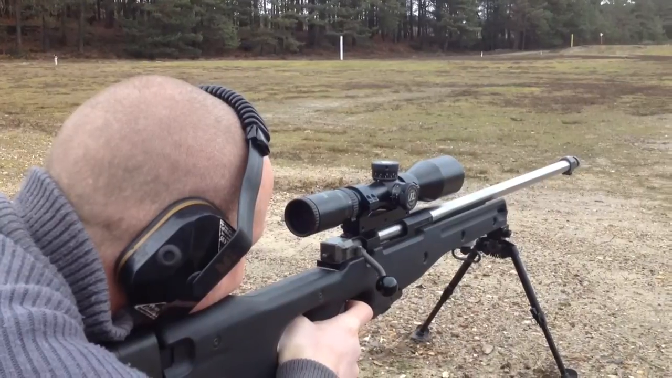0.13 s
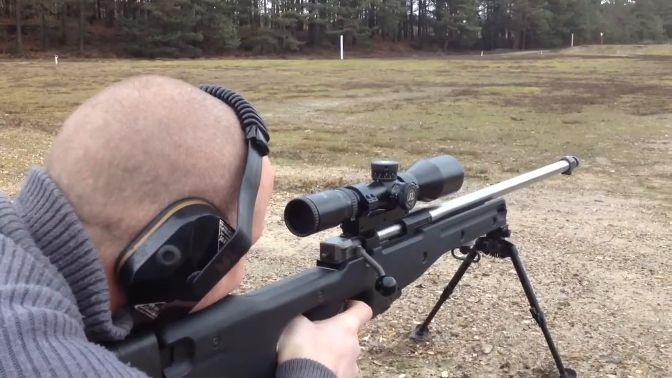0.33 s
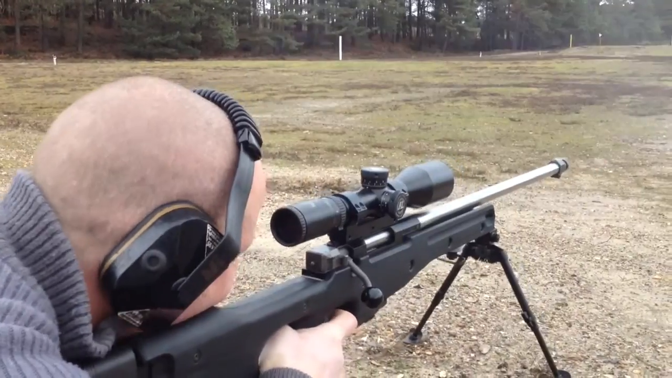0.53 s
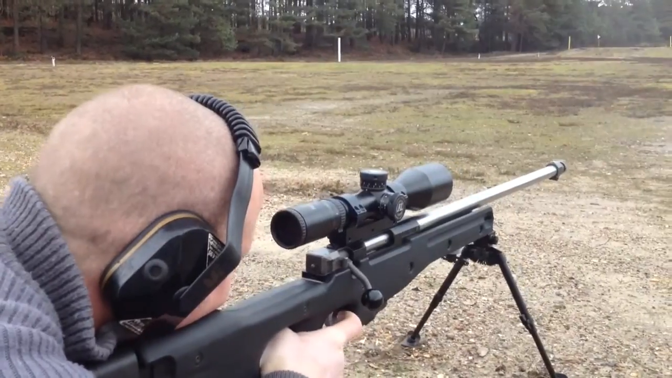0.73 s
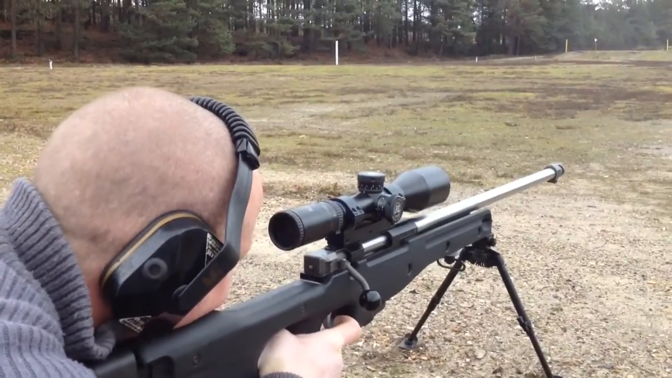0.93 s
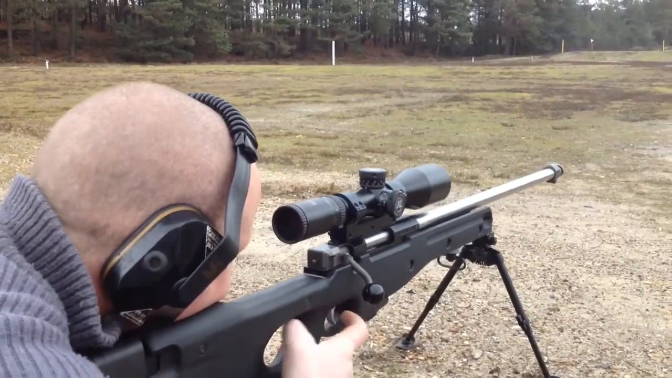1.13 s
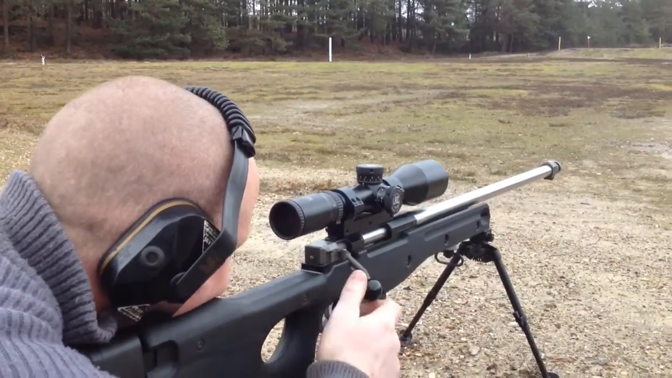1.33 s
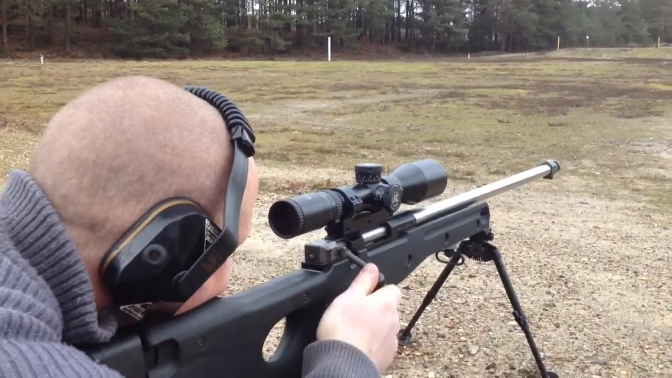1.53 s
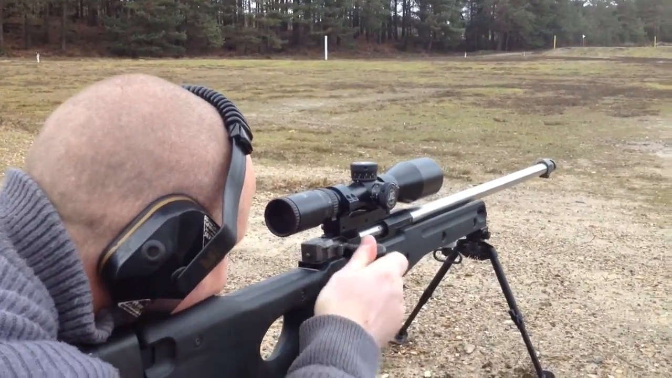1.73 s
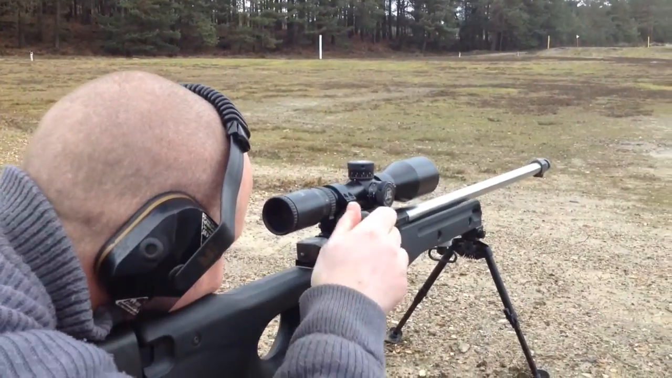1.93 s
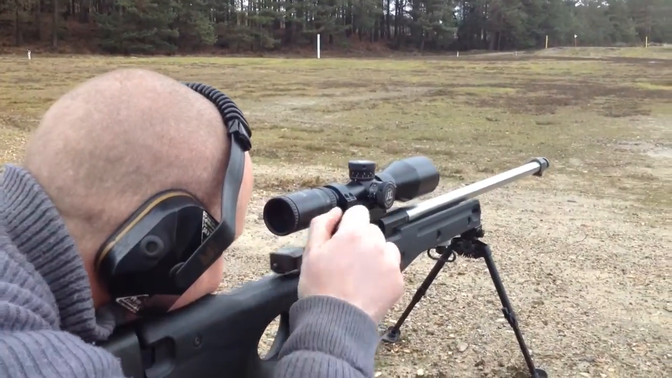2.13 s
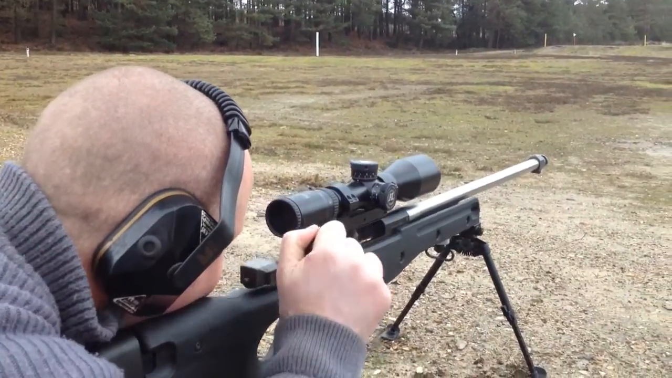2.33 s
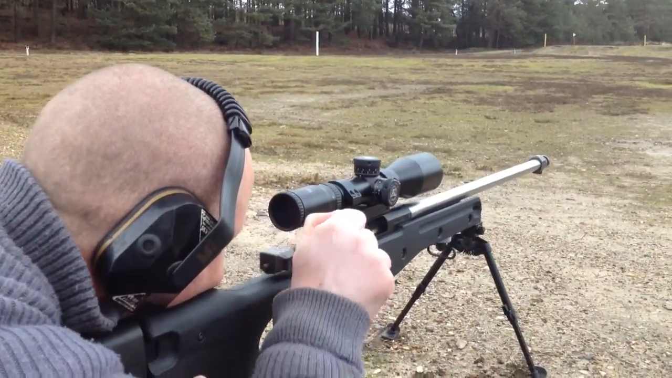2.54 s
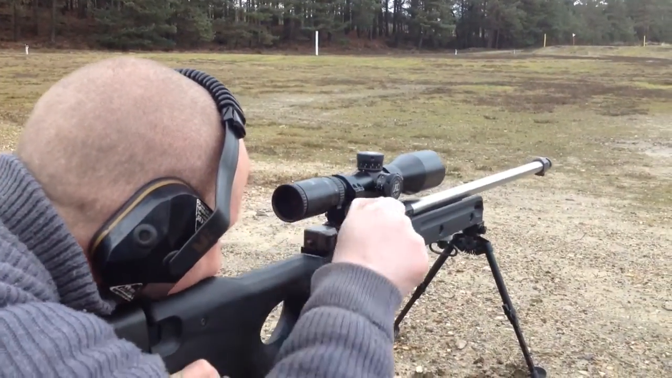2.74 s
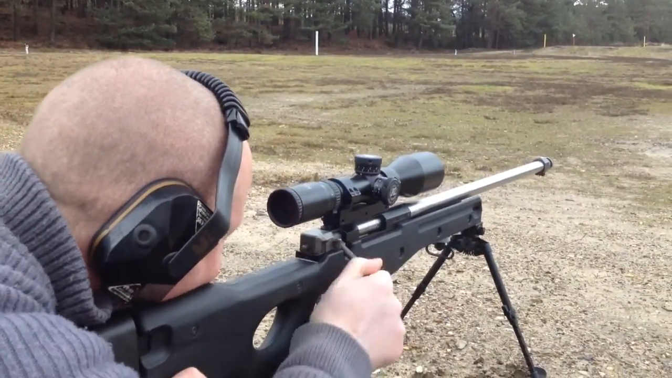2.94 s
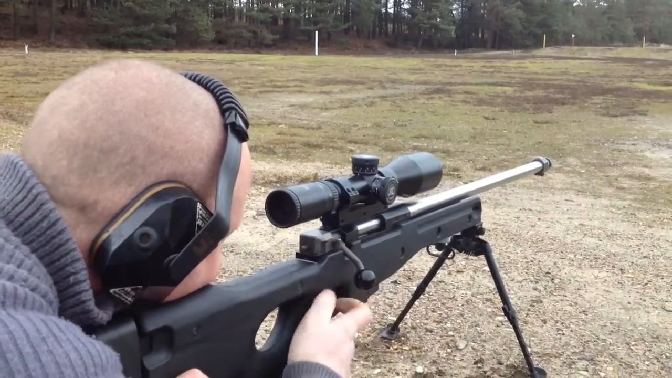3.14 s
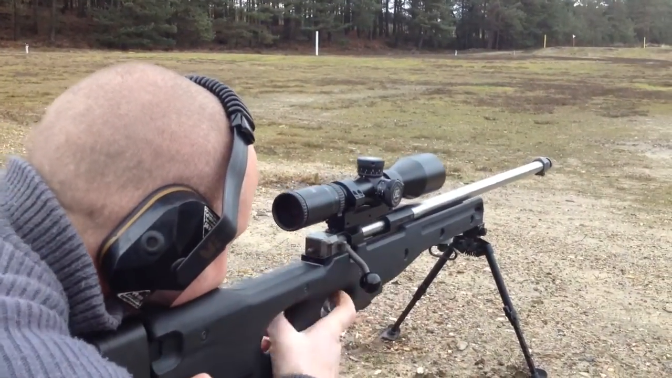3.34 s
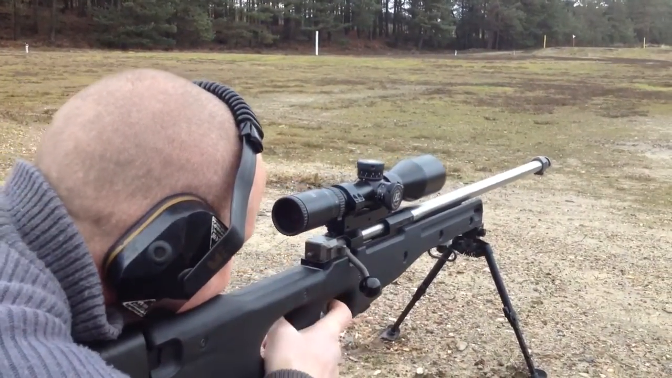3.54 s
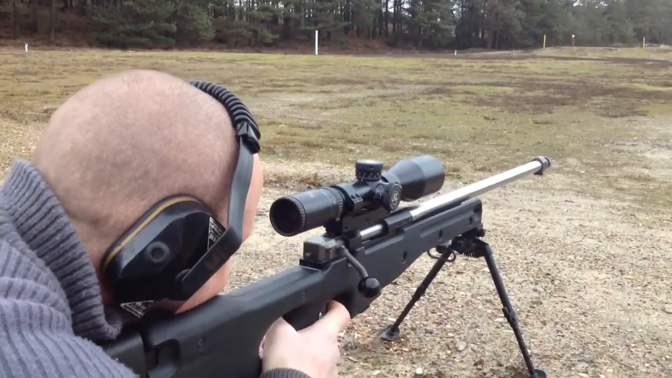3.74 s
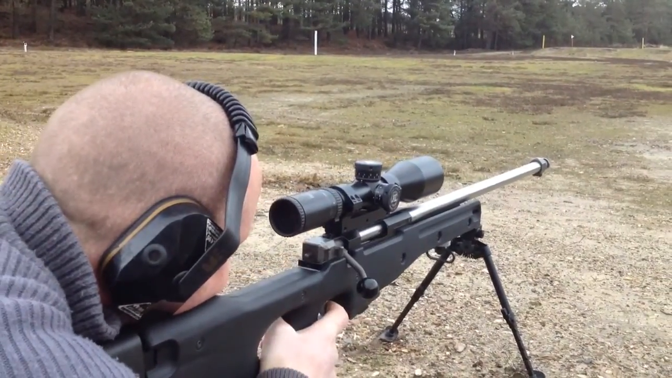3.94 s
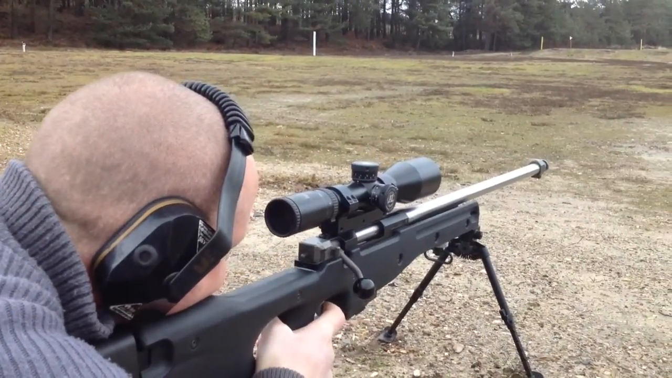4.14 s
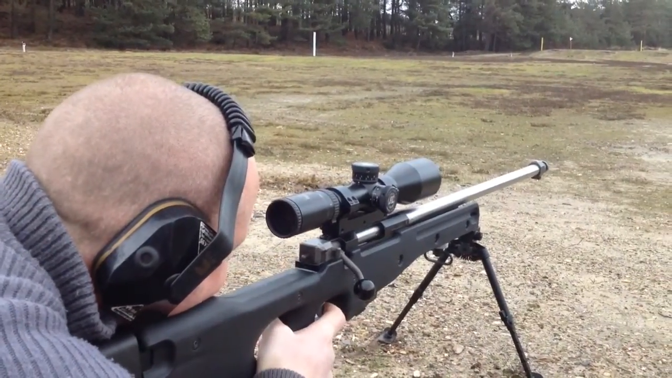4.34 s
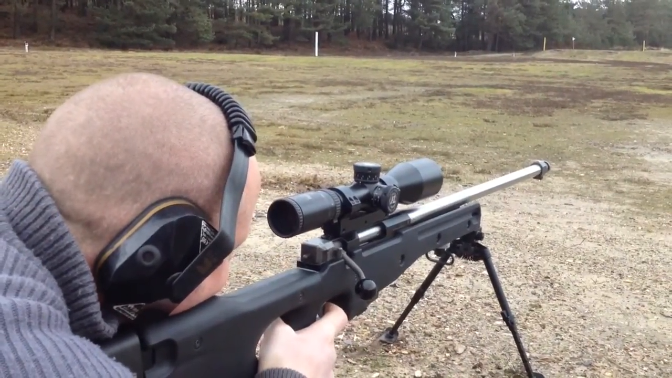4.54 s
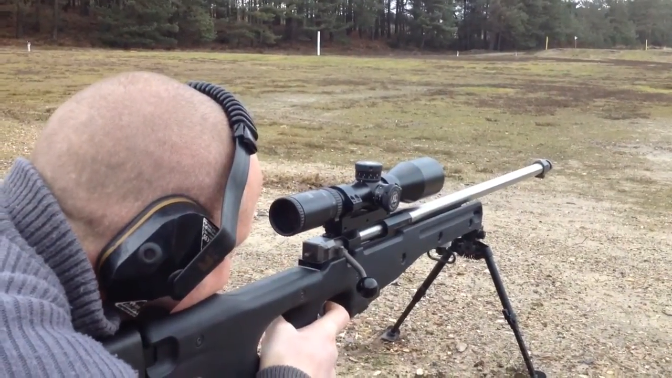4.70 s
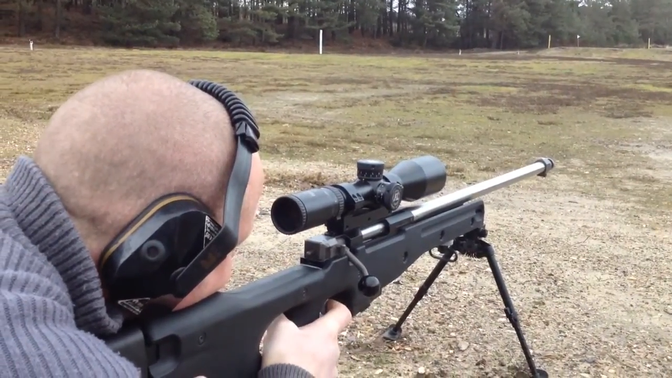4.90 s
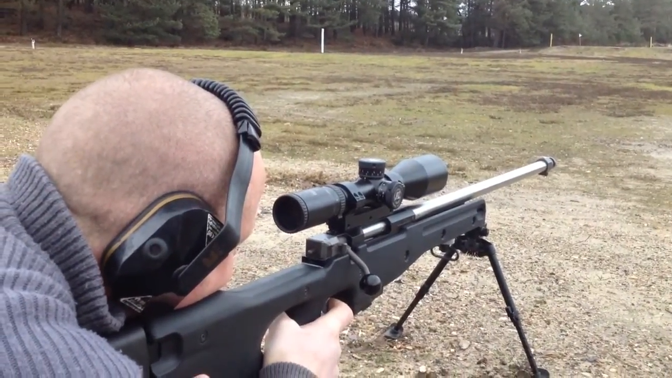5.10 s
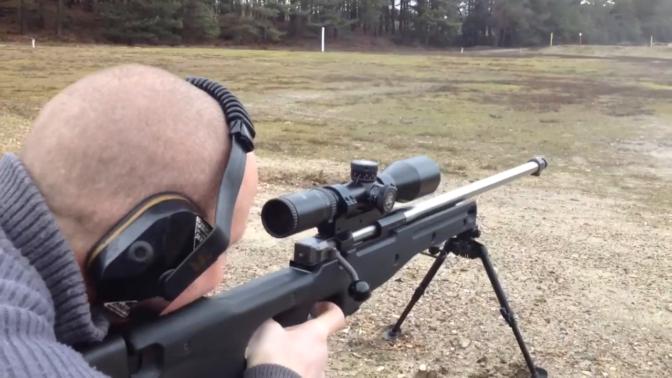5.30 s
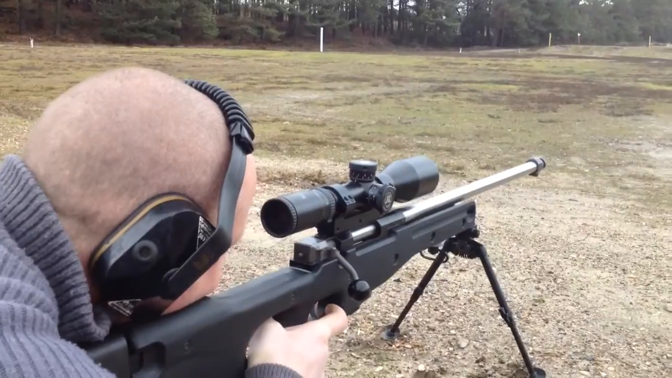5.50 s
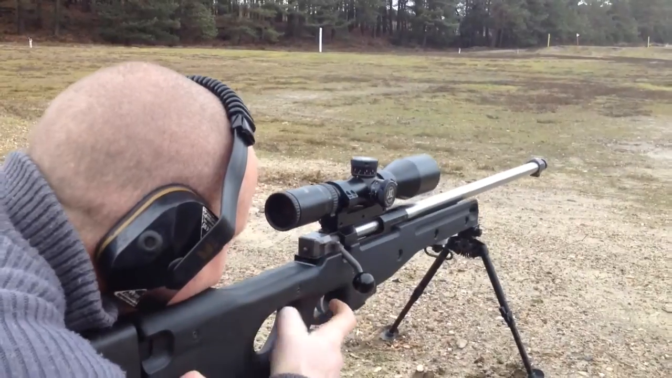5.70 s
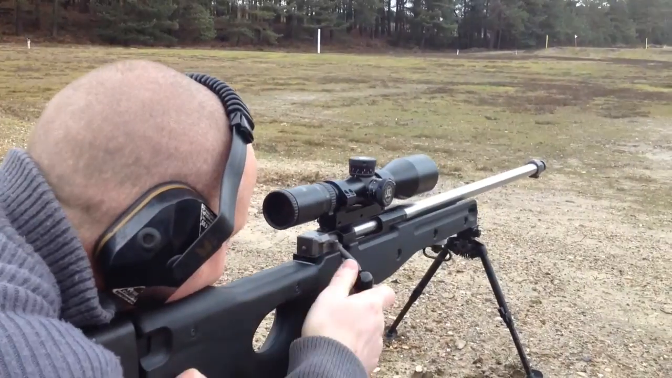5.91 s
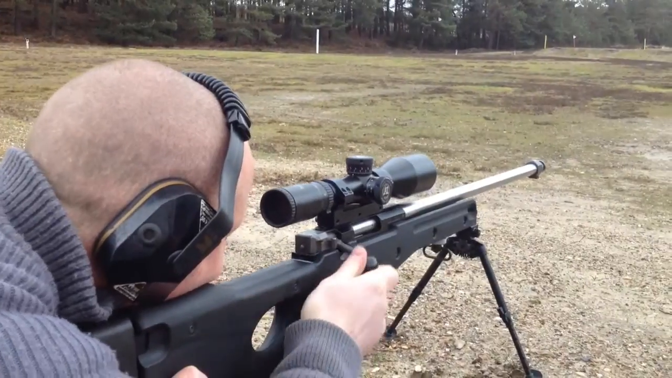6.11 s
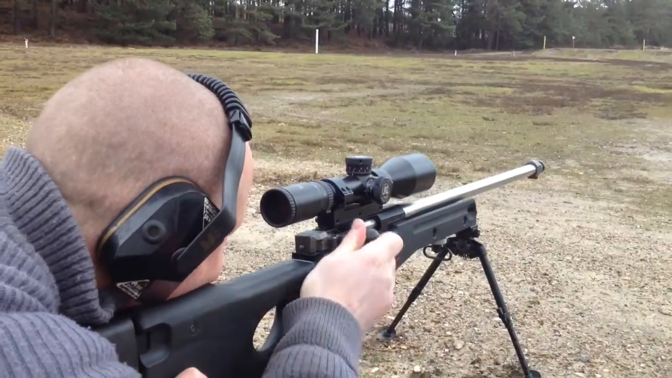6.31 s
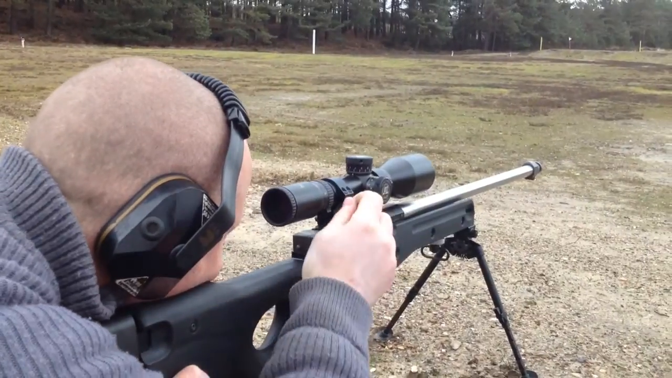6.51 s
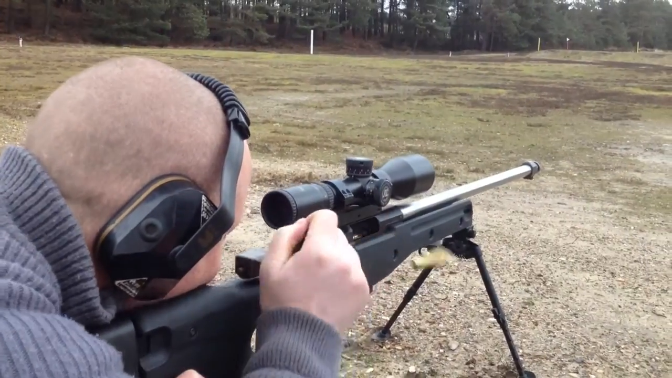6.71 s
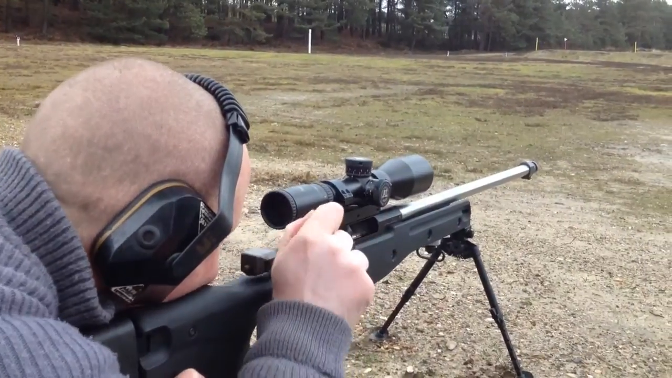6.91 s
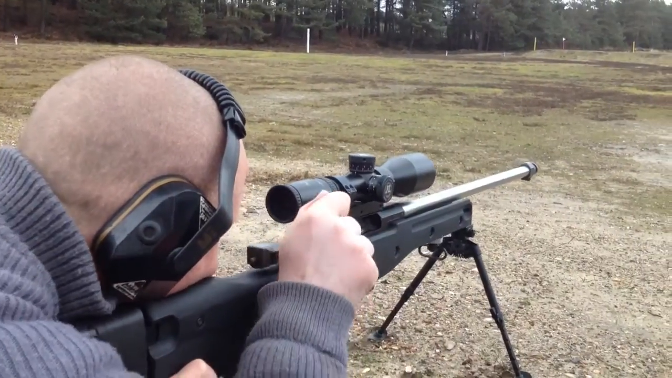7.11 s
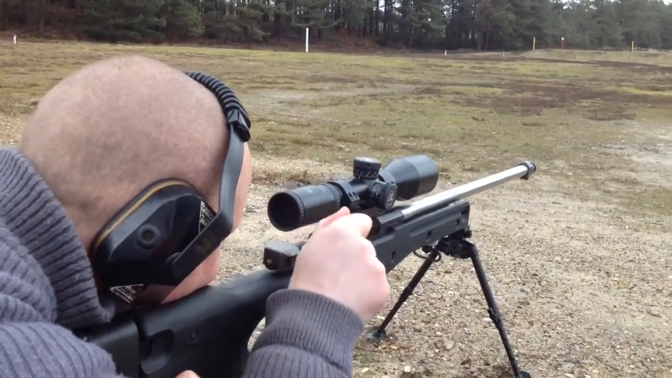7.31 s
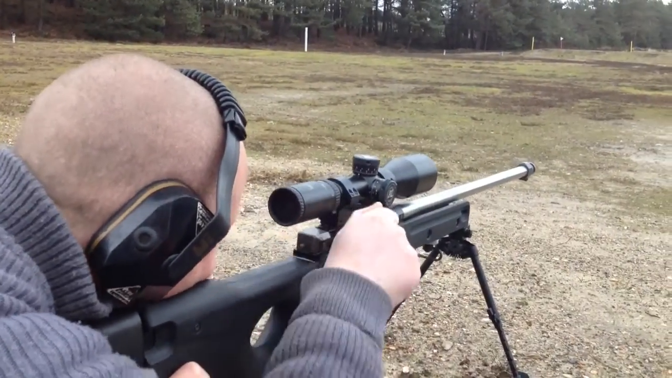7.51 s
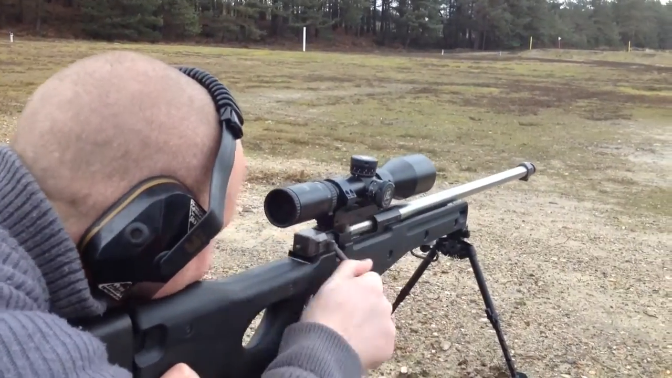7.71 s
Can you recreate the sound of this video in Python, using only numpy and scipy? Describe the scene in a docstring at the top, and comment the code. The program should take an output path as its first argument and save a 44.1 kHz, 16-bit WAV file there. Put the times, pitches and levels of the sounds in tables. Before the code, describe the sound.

Close to the shooter at an outdoor range, a loud, slightly distorted rifle shot cracks and echoes off the trees. The bolt is worked with crisp metallic clacks and scrapes, a brass case tinkles on gravel, and wind briefly rumbles on the microphone. A second shot follows with the same long echo, then another bolt cycle and ringing case. Far traffic and air hiss faintly underneath.

```python
"""Two shots from a bolt-action rifle on an open range, heard from just behind the shooter.
Each blast, a crack and a boom, overloads the microphone, reflects from things nearby and rolls away
as the forest scatters it. The bolt is worked after each shot: impact and friction excite the modes of
the steel, and the spent brass case bounces, ringing, on gravel.
A gust buffets the microphone over a faint wash of distant air and traffic."""
import sys
import numpy as np
from scipy import signal
from scipy.fft import rfft, irfft, next_fast_len
from scipy.io import wavfile
from scipy.ndimage import uniform_filter1d

SR = 44100
rng = np.random.default_rng(int(sys.argv[2]) if len(sys.argv) > 2 else 0)


def master(y):
    """Save y as 16-bit WAV."""
    cut = np.clip(np.atleast_2d(y).T, -1, 1)
    pcm = np.round(cut * 32767)  # scale
    wavfile.write(sys.argv[1], SR, pcm.astype(np.int16))


N = 341775
TIME = np.arange(N) / SR


def amp(db):
    """Amplitude ratio of a level in decibels."""
    return 10 ** (np.asarray(db) / 20)


def unit(x):
    """Normalisation to an rms of one."""
    return x / np.sqrt(np.mean(x ** 2) + 1e-20)


def colour(spectrum, hz):
    """Gain of a spectrum (f/Hz, level/dB), interpolated over log frequency."""
    f, db = np.transpose(spectrum)
    return amp(np.interp(np.log(hz + 1), np.log(f), db))


def tinted(x, spectrum):
    """Linear filtering by a spectrum, normalised to an rms of one."""
    return unit(irfft(rfft(x) * colour(spectrum, np.fft.rfftfreq(len(x), 1 / SR)), len(x)))


def add(mix, s, sound):
    """Superposition: a sound joins the mix at s seconds."""
    part = mix[max(round(s * SR), 0):][:len(sound)]
    part += sound[:len(part)]


def grains(size, spread_db):
    """Gritty noise: log-normal weights make its samples differ widely in strength."""
    return rng.standard_normal(size) * amp(spread_db * rng.standard_normal(size))


def fluctuation(size, span):
    """Random variation of unit rms, correlated over span points by a moving average."""
    return unit(uniform_filter1d(rng.standard_normal(size), size=span))


def ring(modes):
    """Free vibration: one damped sine for each mode (f/Hz, level/dB, T60/s)."""
    t = TIME[:SR // 2]
    return sum(amp(db - 60 * t / t60) * np.sin(2 * np.pi * hz * t) for hz, db, t60 in modes)


def burst(decay_ms, rise_ms):
    """A transient: noise of random sign that swells to a peak of one and decays exponentially."""
    ms = 1000 * TIME[:4096]
    envelope = (1 - np.exp(-ms / rise_ms)) ** 2 * np.exp(-ms / decay_ms)
    return envelope / envelope.max() * rng.choice([-1., 1.], len(ms))


def arrival(t, delay_s, attack_s, hold_s, spread_s, fade_db_per_s):
    """Envelope of a scattered wavefront: it rises, holds, then weakens by spreading and loss."""
    after = np.maximum(t - delay_s - attack_s - hold_s, 0)
    return np.clip((t - delay_s) / attack_s, 0, 1) * amp(-fade_db_per_s * after) / (1 + after / spread_s)


def distant_air(level_db=-50.5, swell_db=1.5):
    """Ambient noise: a far wash with slight, slow amplitude modulation."""
    # air over the range: f/Hz, level/dB
    spectrum = [(25, -40), (45, -33), (90, -10.5), (160, 2), (400, 0.5), (700, -2.5), (1000, -3),
                (1380, -4), (1800, -11.5), (2500, -14), (5000, -30.5), (10000, -38.5), (15000, -40)]
    rates_hz = np.geomspace(1, 8, 16)
    swell = unit(sum(np.sin(2 * np.pi * (f * TIME + rng.random())) / np.sqrt(f) for f in rates_hz))
    return amp(level_db + swell_db * swell) * tinted(rng.standard_normal(N), spectrum)


def traffic():
    """Rolling noise: tyres on a far road radiate a band near 1 kHz that comes and goes."""
    # loudness of the road: t/s, level/dB
    contour = [(0, -57), (3.8, -60.5), (4.35, -51.5), (4.7, -54.5), (7.75, -55)]
    # tyre noise: f/Hz, level/dB
    spectrum = [(400, -28.5), (750, -6), (980, 2), (1350, -2.5), (1700, -20.5), (4000, -49.5)]
    return amp(np.interp(TIME, *np.transpose(contour))) * tinted(rng.standard_normal(N), spectrum)


def turbulence(size, corner_hz):
    """Turbulent pressure on the microphone: a rumble that falls steeply above a corner frequency."""
    # f/Hz, level/dB
    spectrum = [(30, -38), (70, -17), (150, 1), (corner_hz, -4), (2 * corner_hz, -20),
                (4 * corner_hz, -38), (16000, -85)]
    return tinted(rng.standard_normal(size), spectrum)


def wind(eddy_db=-1, eddy_spread_db=4.5, eddy_s=.03, buffet_s=.0039):
    """Intermittent turbulence: a gust of random eddies with a few hard buffets."""
    # envelope of the gust: t/s, level/dB
    contour = [(2.1, -52), (2.48, -47.5), (2.69, -35), (2.96, -32), (3.12, -39), (3.25, -33.5), (3.46, -52),
               (3.56, -40), (3.94, -56), (4.15, -47), (4.2, -64), (4.4, -60)]
    # pressure pulses: t/s, level/dB, corner f/Hz
    buffets = [(2.603, -29, 440), (2.67, -24, 520), (2.707, -23, 342), (2.75, -25, 300),
               (2.834, -25.5, 340), (2.932, -16.5, 470), (2.954, -25, 450), (3.207, -29, 555),
               (3.248, -26, 554), (4.061, -34, 240), (4.136, -34, 190)]
    eddies = unit(amp(eddy_spread_db * fluctuation(N, round(eddy_s * SR))))
    gust_db = np.interp(TIME, *np.transpose(contour), left=-np.inf, right=-np.inf)
    gust = uniform_filter1d(amp(gust_db), size=1024)
    out = amp(eddy_db) * gust * eddies * turbulence(N, corner_hz=250)
    t = TIME[:SR // 2] - TIME[SR // 4]  # centred on the buffet
    for s, db, corner_hz in buffets:
        add(out, s + t[0], amp(db) * turbulence(len(t), corner_hz) / np.cosh(t / buffet_s))
    return out


def action(force, treble_db, direct_db=-9, place_db=3.0):
    """Forced response: the resonances of the steel action filter contact noise, keeping its energy."""
    # resonances of the action: f/Hz, bandwidth/Hz, level/dB
    resonances = [(2285, 480, 2), (3150, 284, -7), (3775, 150, -7), (4940, 180, -1), (6500, 360, -8),
                  (7170, 360, -5), (8150, 150, -10), (8930, 290, -7), (11130, 200, -16.5), (12800, 190, 0),
                  (13700, 290, -12.5)]
    # spectrum of a contact: f/Hz, level/dB
    contact = [(150, -37.5), (600, -5), (1100, 6), (1600, -2.5), (2200, 5), (7500, 4), (11000, 3),
               (15000, -6.5)]
    size = next_fast_len(2 * len(force))
    hz = np.fft.rfftfreq(size, 1 / SR)
    # every contact lands on another spot and favours other modes
    body = amp(direct_db) + sum(amp(db + place_db * rng.standard_normal()) / (1 + 2j * (hz - f) / width)
                                for f, width, db in resonances)
    hardness = amp(treble_db * (hz / 13000) ** 1.1)  # a harder contact excites more treble
    response = irfft(rfft(force, size) * body * hardness * colour(contact, hz), size)[:len(force)]
    return unit(response) * np.sqrt(np.mean(force ** 2))


def steel_ring(place_db=1.0):
    """Free decay of the action; the strength of each mode varies with the spot struck."""
    # lasting modes of the steel: f/Hz, level/dB, T60/s
    modes = [(2310, 2.5, 0.1), (3180, -5.5, 0.053), (5200, -9.5, 0.057), (5710, -15, .045),
             (7750, -4, 0.013), (9340, -3, .05)]
    return ring([(hz, db + place_db * rng.standard_normal(), t60) for hz, db, t60 in modes])


def brass_cases(middle_db=-5, twin_db=-8, twin_t60_ratio=1.5, spin_hz=17, spin_depth=0.38):
    """Mode splitting: a case is not quite round, so its modes beat in pairs; tumbling adds flutter."""
    # three modes for each case: f/Hz, split of the pair/Hz, T60/s
    cases = [
        [(9600, 47.5, 0.182), (12600, 59.5, .2), (14430, -110, 0.13)],
        [(9570, 31.5, 0.16), (12460, 54, 0.14), (14530, -43, 0.16)],
    ]
    # ejection and bounces of each case: t/s, tick level/dB, ring level/dB, top mode's extra level/dB
    impacts = [
        [(2.2476, -38, -34.5, 1), (2.5162, -16.5, -33.5, 25), (2.7724, -33, -40, -3), (2.956, -59, -41.5, -12)],
        [(6.7224, -34, -29.5, 0), (6.9785, -19.5, -22.5, -2.5), (7.2462, -32, -35.5, -7)],
    ]
    out, t = np.zeros(N), TIME[:SR // 2]
    for modes, hits in zip(cases, impacts):
        for s, tick_db, ring_db, top_db in hits:
            levels = ring_db, ring_db + middle_db, ring_db + top_db
            for (hz, split_hz, t60), db in zip(modes, levels):
                flutter_hz = 2 * spin_hz * rng.uniform(0.93, 1.4)  # two maxima a turn
                flutter = 1 + spin_depth * np.cos(2 * np.pi * flutter_hz * t)
                pair = ring([(hz, db, t60), (hz + split_hz, db + twin_db, t60 * twin_t60_ratio)])
                add(out, s, flutter * pair)
            add(out, s, amp(tick_db) * action(burst(decay_ms=1.0, rise_ms=0.6), treble_db=6.5))
    return out


def bolt_knocks(rise_ms=1.1, graze_lead_s=.006, graze_db=-20, rattle_db=-27, rattle_ms=12):
    """Impact excitation: steel parts graze, strike with a short rattle and ring on."""
    # knocks through two cycles of the bolt: t/s, level/dB, stage
    knocks = [(1.6243, -40.5, "rattle"), (1.8776, -20, "lift"), (2.182, -19.5, "extract"),
              (2.248, -23, "eject"), (2.2714, -21, "eject"), (2.2945, -13, "stop"), (2.46, -35, "rattle"),
              (2.625, -20.5, "feed"), (2.6516, -25.5, "feed"), (2.694, -18, "home"),
              (2.8759, -23.5, "lock"), (4.64, -54, "rattle"), (6.4189, -17, "lift"),
              (6.5942, -33, "rattle"), (6.6518, -19, "extract"), (6.6993, -25, "eject"),
              (6.7338, -20.5, "stop"), (6.7452, -18, "stop"), (6.882, -32.5, "rattle"),
              (7.322, -28.5, "feed"), (7.3613, -21.5, "feed"), (7.4192, -34.5, "rattle"),
              (7.4563, -28.5, "feed"), (7.486, -11, "home"), (7.69, -20, "lock")]
    # contact at each stage: treble gain/dB, decay time/ms, relative ring level/dB
    stages = {"lift": (-1.3, 3.3, -33), "extract": (15.2, 2.7, -25), "eject": (-14, 3.1, -15),
              "stop": (-19, 1.4, -19.5), "feed": (-7.5, 4.5, -8), "home": (6, 3.3, -38),
              "lock": (13.3, 0.86, -29), "rattle": (-10, 3, -22)}
    out = np.zeros(N)
    for s, db, stage in knocks:
        treble_db, contact_ms, ring_db = stages[stage]
        add(out, s - graze_lead_s, amp(db + graze_db) * action(burst(4, 2.0), treble_db))
        contact = burst(contact_ms, rise_ms) + amp(rattle_db) * burst(rattle_ms, rise_ms)
        add(out, s - rise_ms / 1000, amp(db) * action(contact, treble_db))
        add(out, s, amp(db + ring_db) * steel_ring())
    return out


def bolt_slides(catch_db=6.0, ring_db=-7):
    """Friction: sliding surfaces catch unevenly, and the gritty force drives the modes of the steel."""
    # bolt in its raceway, sleeve on the stock: start t/s, end t/s, level/dB, treble gain/dB
    slides = [(0.078, 0.136, -53.5, -12), (1.87, 1.96, -60, -6), (2.163, 2.262, -47.5, -14),
              (2.258, 2.329, -33, -1), (2.584, 2.706, -40, 1), (3.216, 3.31, -62, -6),
              (6.627, 6.798, -39.5, 1), (7.258, 7.419, -37.5, -13), (7.423, 7.511, -37, -22)]
    out = np.zeros(N)
    for start, end, db, treble_db in slides:
        size = round((end - start) * SR)
        catches = amp(catch_db * fluctuation(size, span=160))
        friction = amp(db) * unit(grains(size, spread_db=1.8) * catches) * signal.windows.tukey(size, .7)
        steel = steel_ring()
        add(out, start, action(friction, treble_db))
        add(out, start, amp(ring_db) * signal.fftconvolve(friction, steel / np.linalg.norm(steel)))
    return out


def bolt_handle(rattle_db=-17):
    """Damped impact: the handle seats against the stock with a tick and a brief ring."""
    # seatings of the handle: t/s, ring level/dB, tick level/dB
    seatings = [(2.923, -21, -25), (7.73, -18.5, -22.5)]
    # modes of the handle on the stock: f/Hz, level/dB, T60/s
    modes = [(990, -1.5, 0.041), (3068, -19, 0.013), (4720, 1, 0.018)]
    out = np.zeros(N)
    for s, ring_db, tick_db in seatings:
        contact = burst(decay_ms=1.9, rise_ms=0.26) + amp(rattle_db) * burst(decay_ms=12, rise_ms=1.1)
        add(out, s, amp(ring_db) * ring(modes))
        add(out, s, amp(tick_db) * action(contact, treble_db=1.7))
    return out


def forest_roll(peak_db=-27.5, peak_s=0.4, far_side_s=2.06, patch_db=1.08, clump_db=1.64):
    """Scattering: countless trunks return the shot; air absorption takes more treble on longer paths."""
    # scattered sound: f/Hz, level/dB
    spectrum = [(40, -66), (100, -23), (190, -3.5), (350, 6), (520, 0.5), (750, -9.5), (1300, -9.5),
                (1700, -10.5), (2400, -5.5), (4000, -12.5), (8000, -17), (14000, -22)]
    rise_db_per_s, db_per_doubling, end_db_per_s, air_db_per_s = 124.5, 4.5, 19, 24
    size = 4 * SR
    hz, t, echoes = signal.stft(tinted(grains(size, spread_db=5), spectrum), SR, nperseg=512)
    # the level wavers in time-frequency patches and in broadband clumps
    patches = uniform_filter1d(rng.standard_normal(echoes.shape), size=9, axis=0)
    patches = unit(uniform_filter1d(patches, size=9, axis=1))
    clumps = fluctuation(len(t), span=5)
    absorption_db = air_db_per_s * t * (hz[:, None] / 8000) ** 1.75
    # the roll builds, weakens with distance and ends past the far side of the wood
    level_db = (peak_db - rise_db_per_s * np.maximum(peak_s - t, 0)
                - db_per_doubling * np.log2(np.maximum(t / peak_s, 1))
                - end_db_per_s * np.maximum(t - far_side_s, 0))
    echoes *= amp(level_db - absorption_db + patch_db * patches + clump_db * clumps)
    return signal.istft(echoes, SR, nperseg=512)[1][:size]


def forest_edge_echo(level_db=-27):
    """Reflection: the front row of trees returns the low body of the blast as a dull thump."""
    # reflected sound: f/Hz, level/dB
    spectrum = [(35, -37), (80, -18), (170, 6.5), (380, 6), (700, -9), (1200, -24), (2200, -35),
                (9000, -56)]
    t = TIME[:2 * SR]
    envelope = arrival(t, delay_s=.338, attack_s=.011, hold_s=.0072, spread_s=.093, fade_db_per_s=13.5)
    return amp(level_db) * envelope * tinted(rng.standard_normal(len(t)), spectrum)


def near_reflections(rebound_s=.0445, rebound_db=-7):
    """Early reflections: things nearby slap back, the strongest like a second crack."""
    # single reflections: delay t/ms, level/dB, decay time/ms
    slaps = [(59, -13, 2.2), (90, -19.5, 5.1), (130.5, -18.5, 1.2), (152, -33, 1.8), (207, -38, 3.7)]
    # the strongest reflection: f/Hz, level/dB
    spectrum = [(100, -11), (500, -8.5), (1100, -1), (2500, -2), (5000, -8.5), (8000, -17), (15000, -26)]
    out = np.zeros(SR)
    for delay_ms, db, decay_ms in slaps:
        add(out, delay_ms / 1000, amp(db) * burst(decay_ms, rise_ms=0.13))
    rebound = tinted(rng.standard_normal(4096), spectrum) * abs(burst(decay_ms=3.2, rise_ms=1.2))
    add(out, rebound_s, amp(rebound_db) * rebound)
    return out


def boom(level_db=-9, dull_db_per_s=48):
    """Spreading and absorption: the heavy body of the blast thins and dulls on longer ground paths."""
    # body of the blast: f/Hz, level/dB
    spectrum = [(25, -32.5), (60, -30), (110, -7.5), (180, 2), (380, 6.5), (700, -4.5), (1200, -5.5),
                (1900, -11.5), (4500, -15.5), (8000, -19), (14500, -33)]
    hz, t, body = signal.stft(tinted(rng.standard_normal(SR), spectrum), SR, nperseg=256)
    body *= amp(-dull_db_per_s * t * np.sqrt(hz[:, None] / 5000))
    envelope = arrival(TIME[:SR], delay_s=.014, attack_s=.012, hold_s=.036, spread_s=.017,
                       fade_db_per_s=19.5)
    return amp(level_db) * envelope * signal.istft(body, SR, nperseg=256)[1][:SR]


def crack(level_db=-11, hold_s=.02, fade_db_per_s=699.5):
    """A broadband transient: the bright front of the blast holds briefly, then dies fast."""
    # front of the blast: f/Hz, level/dB
    spectrum = [(30, -29.5), (100, -9), (250, -0.5), (1500, 0), (4500, -3), (8000, -5), (14500, -8)]
    envelope = amp(level_db - fade_db_per_s * np.maximum(TIME[:SR] - hold_s, 0))
    return envelope * tinted(rng.standard_normal(SR), spectrum)


def rifle_blast(ragged_db=2.0):
    """Multipath arrival: crack and boom come in clumps of a few milliseconds, with near reflections."""
    return (crack() + boom()) * amp(ragged_db * fluctuation(SR, span=130)) + near_reflections()


def scene():
    """Superposition of the background, the bolt, the cases and the shots with their echoes."""
    # rifle shots: t/s, level/dB
    shots = [(0.4541, 0.5), (5.2122, .5)]
    out = distant_air() + traffic() + wind()
    out += bolt_knocks() + bolt_slides() + bolt_handle() + brass_cases()
    for s, db in shots:
        for sound in (rifle_blast(), forest_edge_echo(), forest_roll()):
            add(out, s, amp(db) * sound)
    return out[None]


def record(dry, ceiling=.64, low_cut_hz=70, band_limit_hz=15450):
    """Saturation: the microphone overloads on the blasts; its dips, wind filter and band limit follow."""
    # narrow dips in the microphone's response: f/Hz, width/Hz, gain/dB
    dips = [(1547, 100, -3), (2700, 98, -2)]
    clipped = dry / (1 + (dry / ceiling) ** 4) ** (1 / 4)
    size = next_fast_len(N + SR)
    hz = np.fft.rfftfreq(size, 1 / SR)
    dips_db = sum(db * np.exp(-((hz - f) / width) ** 2) for f, width, db in dips)
    wind_filter = 1j * hz / (1j * hz + low_cut_hz)
    heard = irfft(rfft(clipped, size) * amp(dips_db) * wind_filter, size)[:, :N]
    low_pass = signal.firwin(255, band_limit_hz, window=("kaiser", 8), fs=SR)
    return signal.oaconvolve(heard, low_pass[None], "same")


dry = scene()
out = record(dry)
master(out)
```